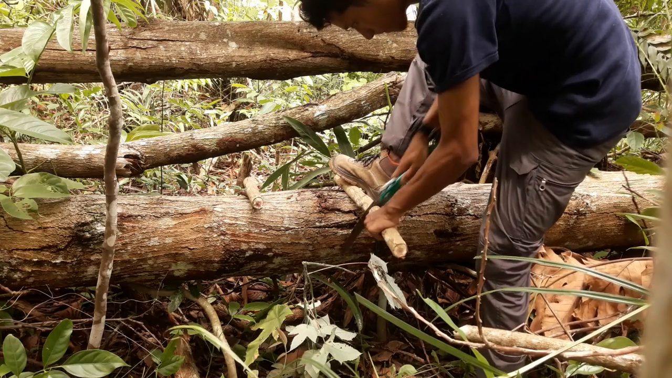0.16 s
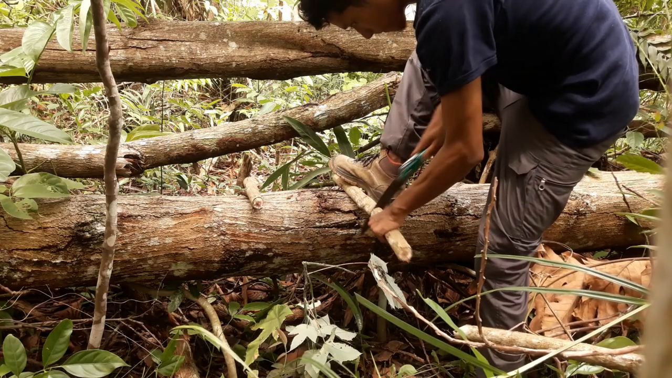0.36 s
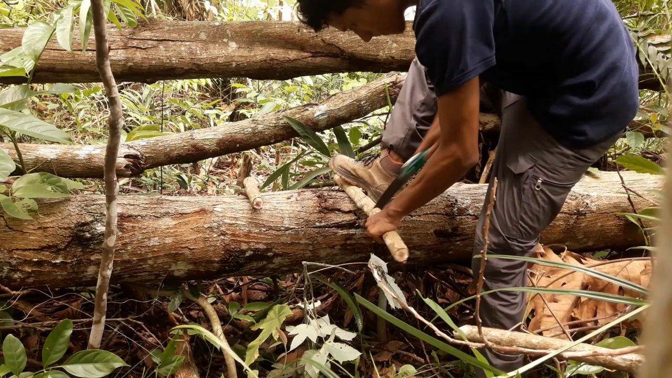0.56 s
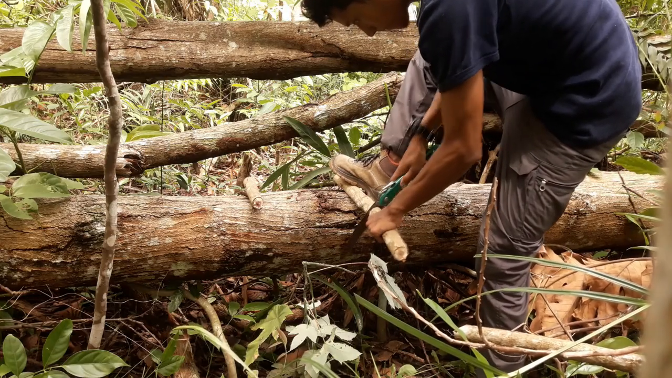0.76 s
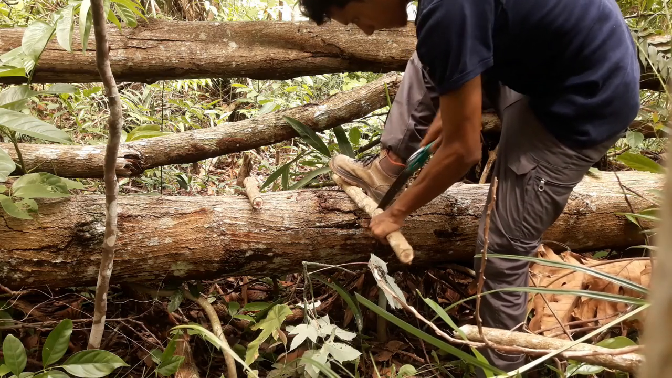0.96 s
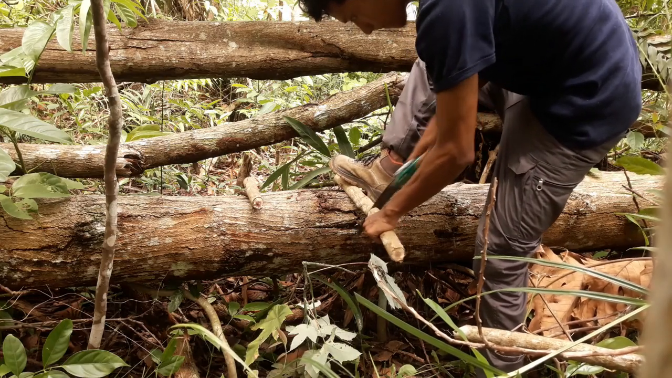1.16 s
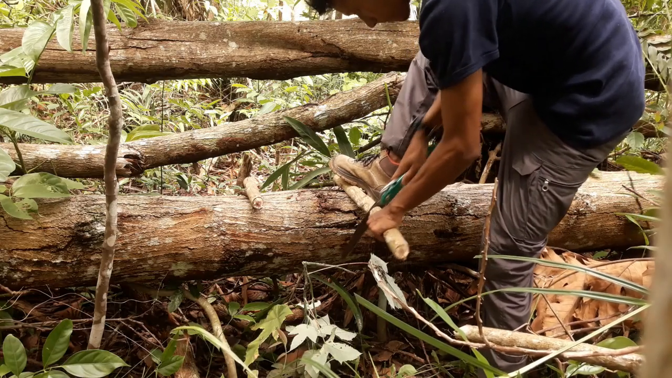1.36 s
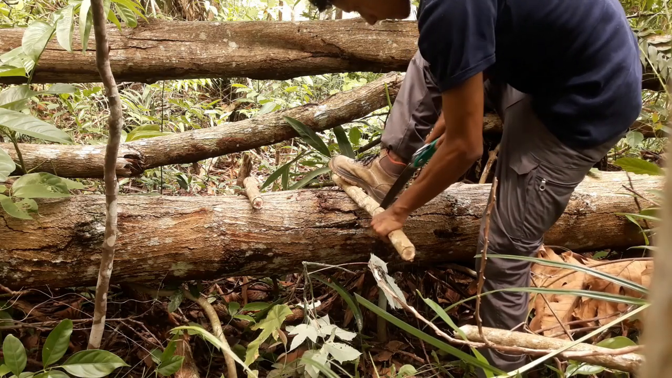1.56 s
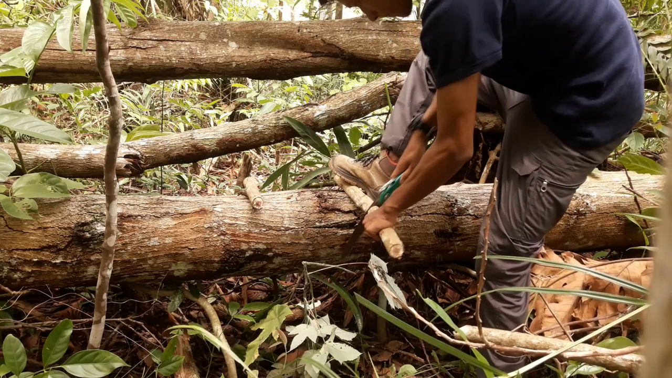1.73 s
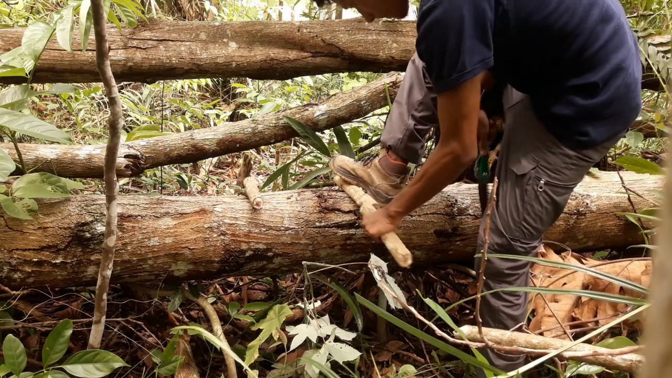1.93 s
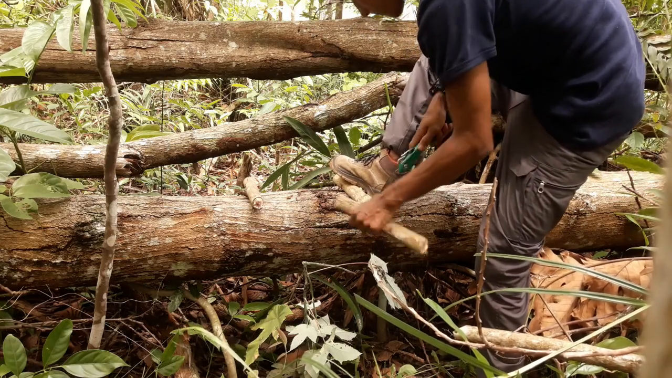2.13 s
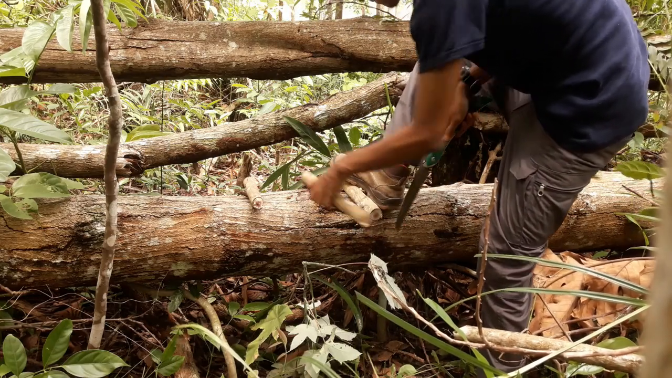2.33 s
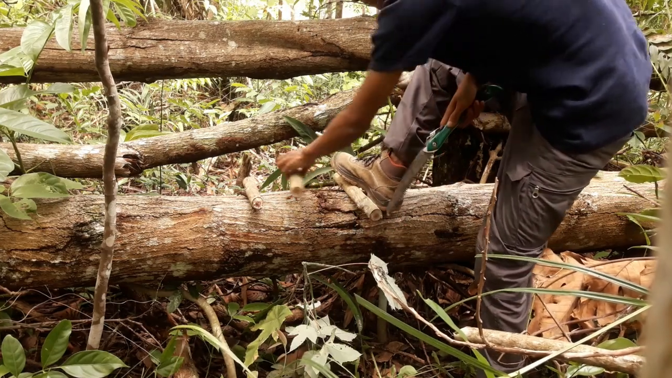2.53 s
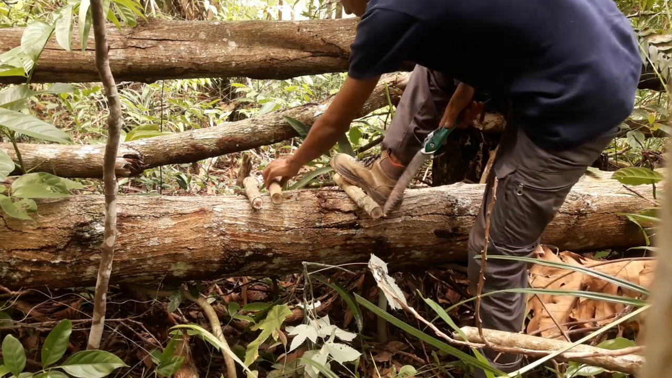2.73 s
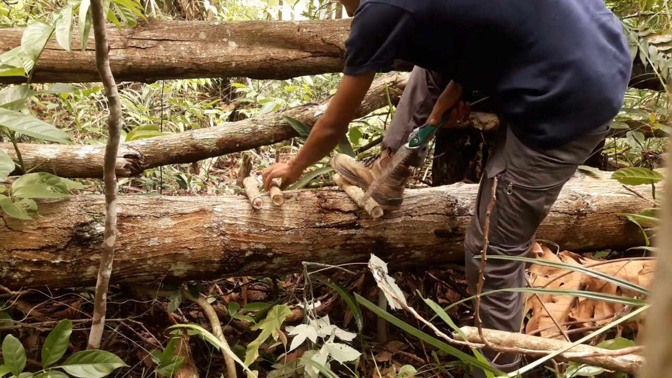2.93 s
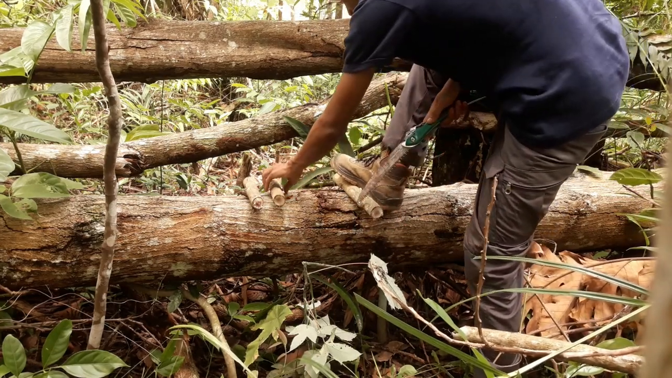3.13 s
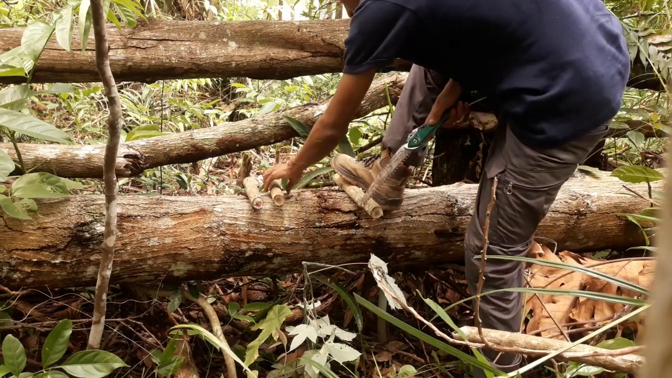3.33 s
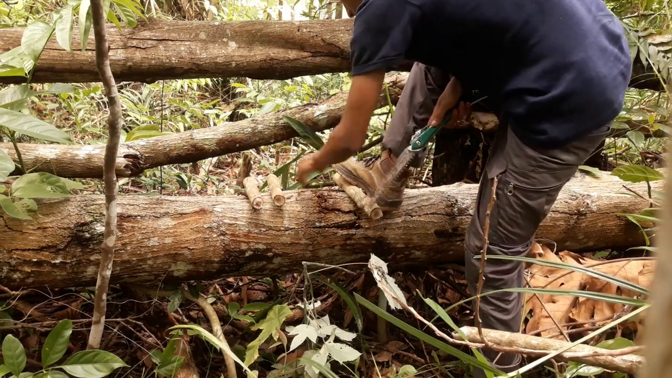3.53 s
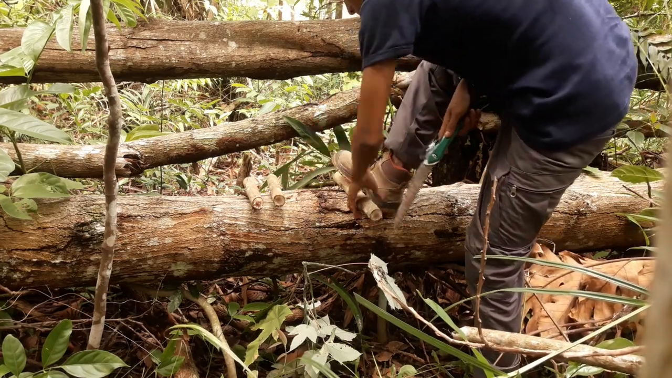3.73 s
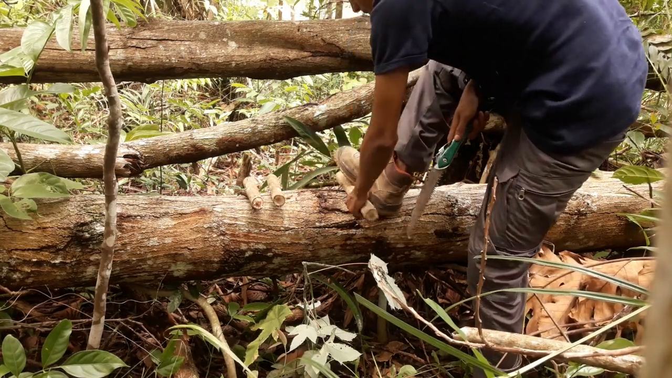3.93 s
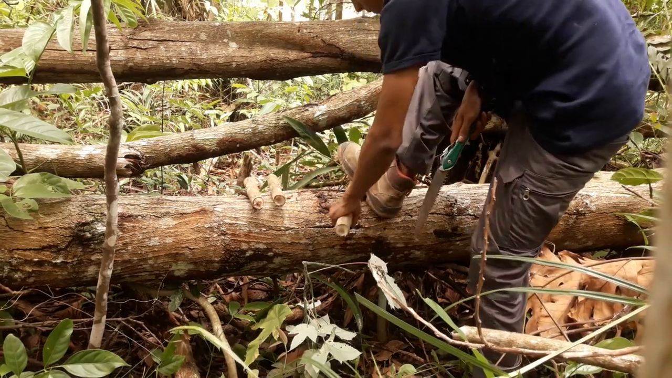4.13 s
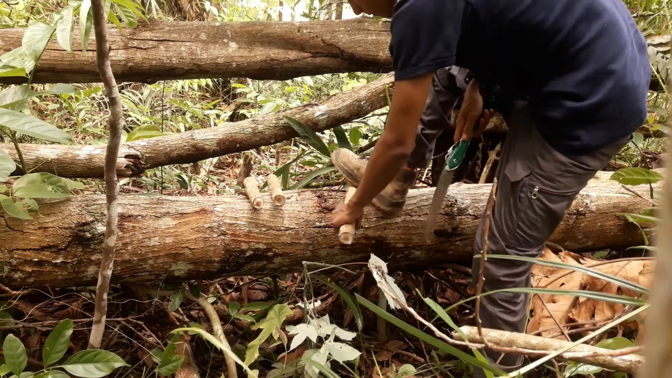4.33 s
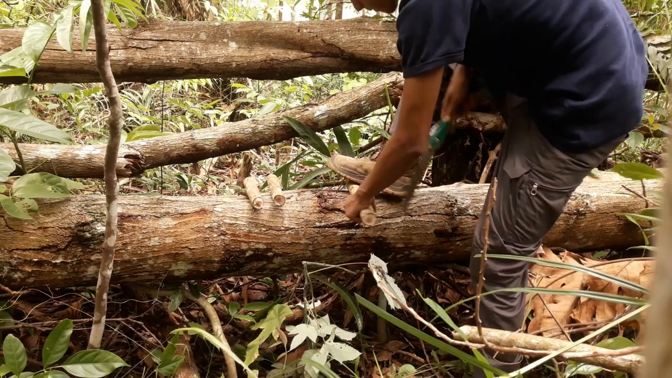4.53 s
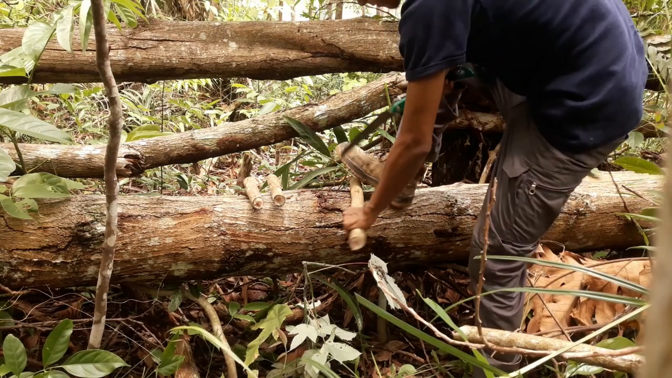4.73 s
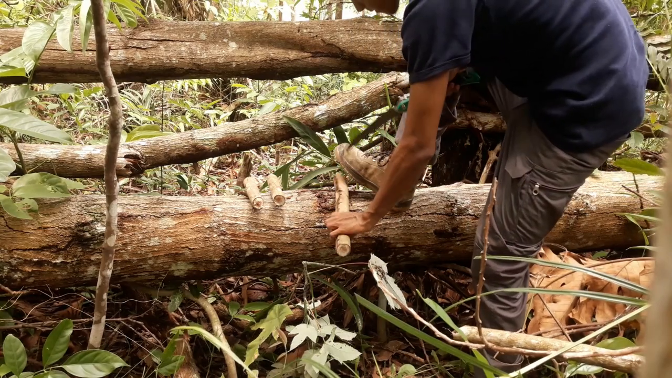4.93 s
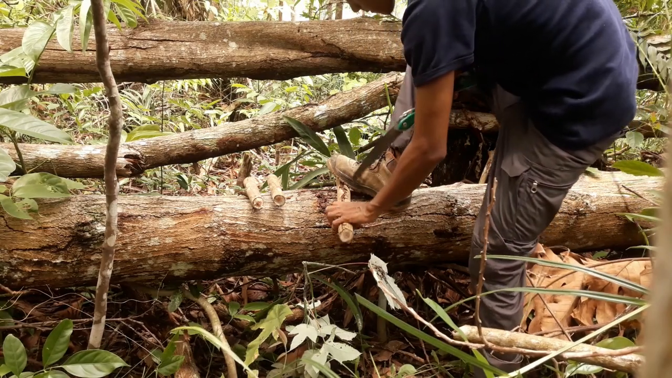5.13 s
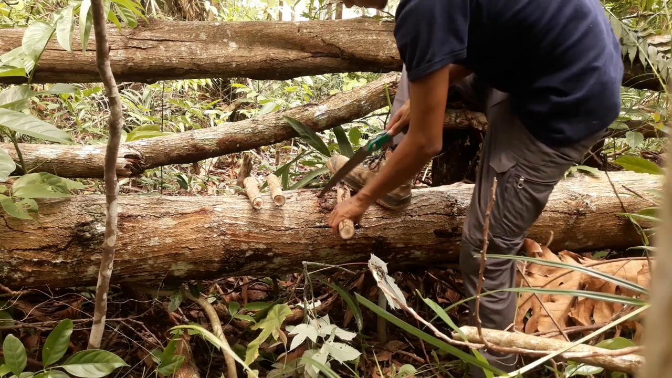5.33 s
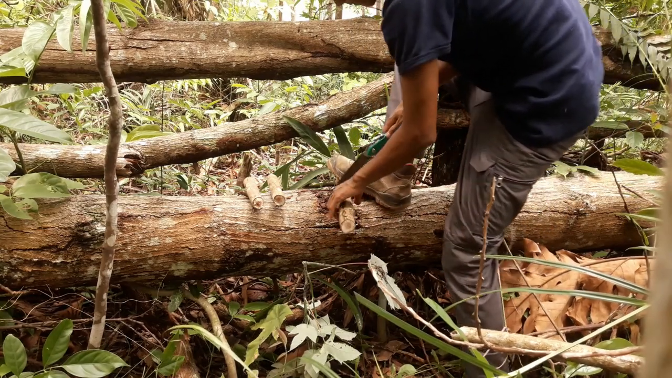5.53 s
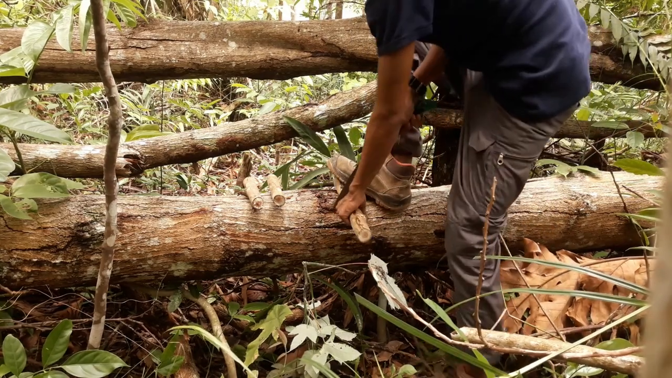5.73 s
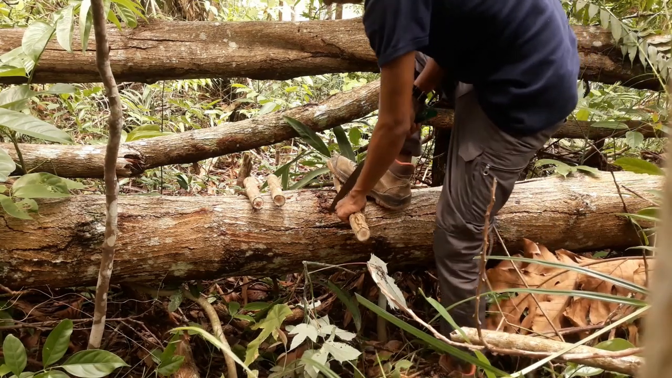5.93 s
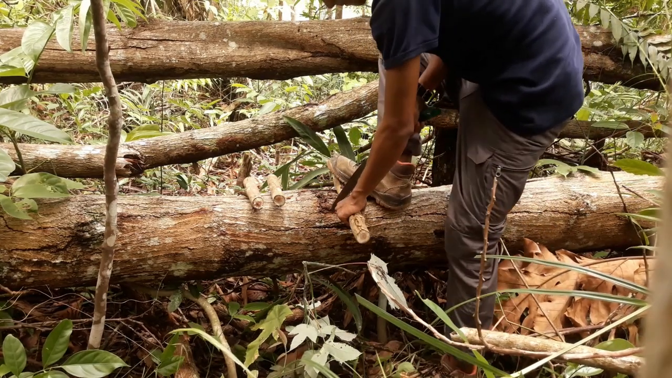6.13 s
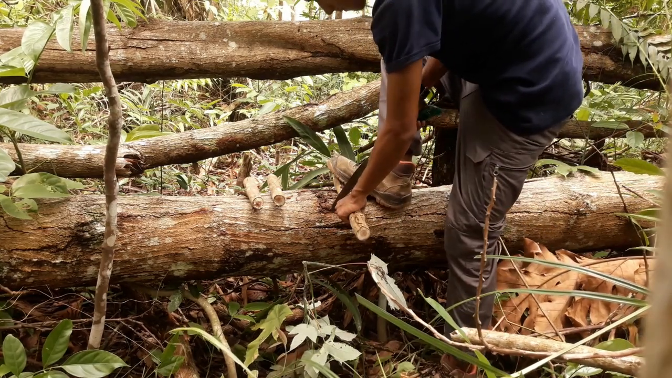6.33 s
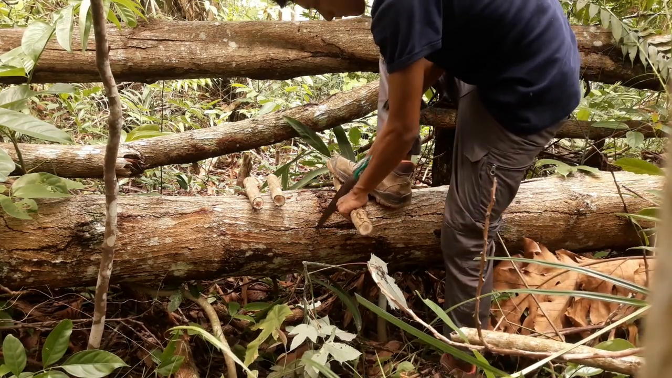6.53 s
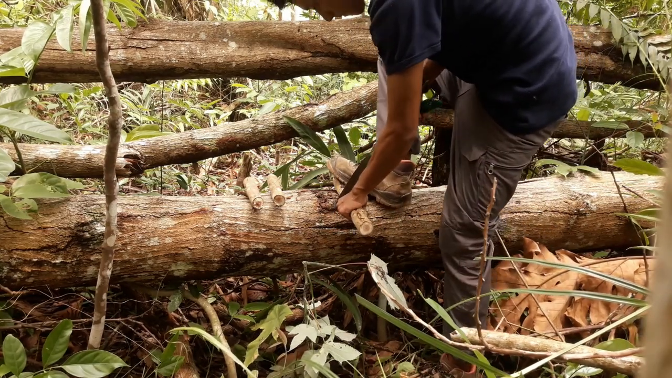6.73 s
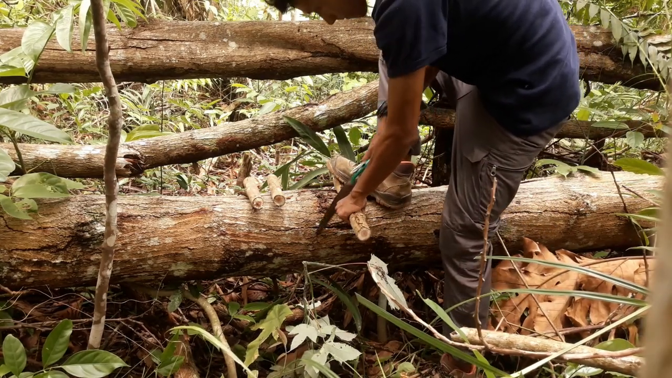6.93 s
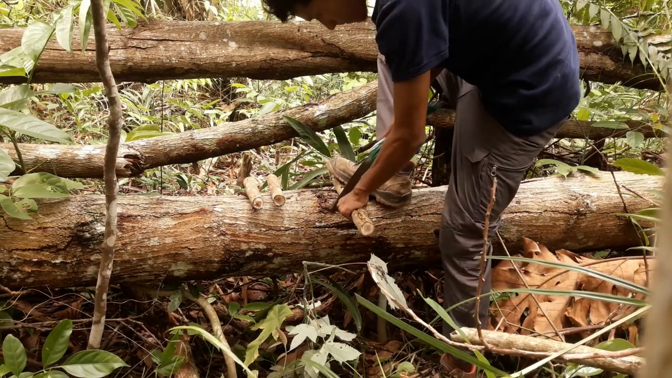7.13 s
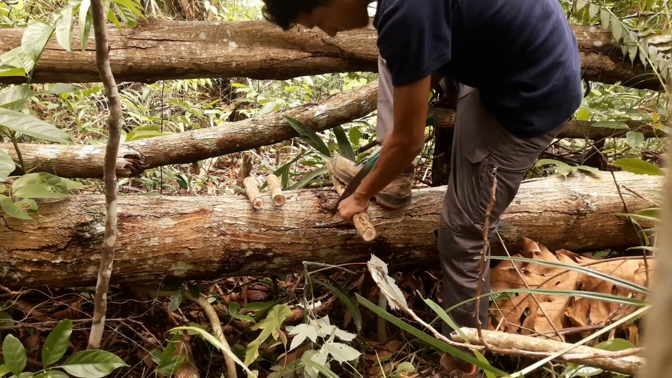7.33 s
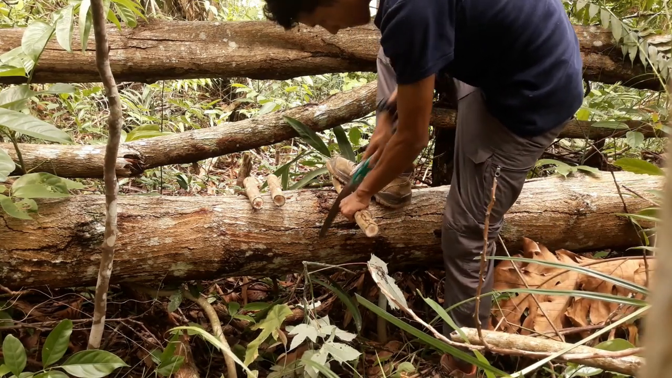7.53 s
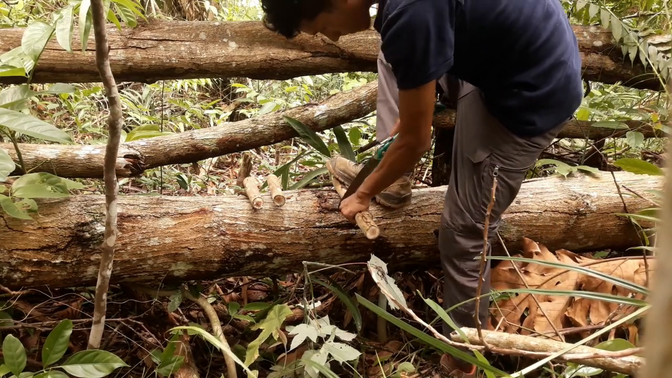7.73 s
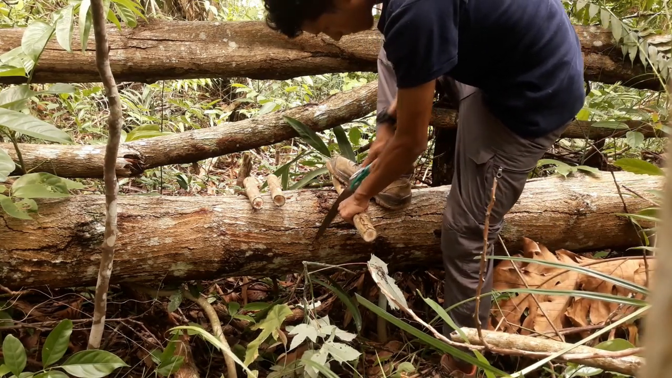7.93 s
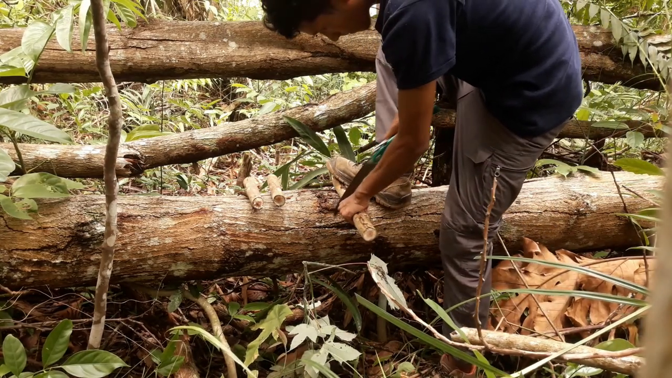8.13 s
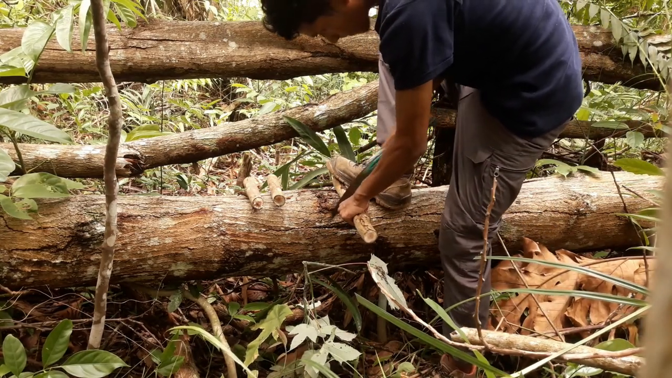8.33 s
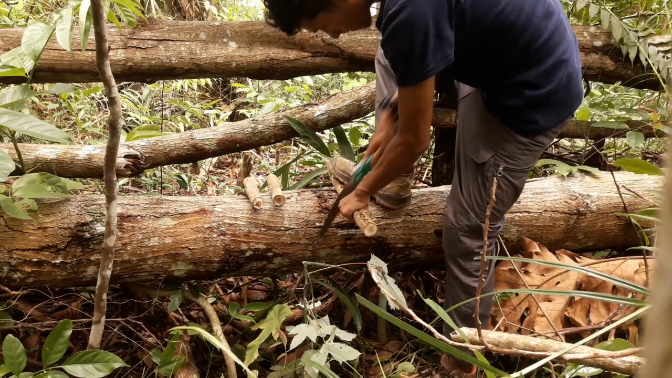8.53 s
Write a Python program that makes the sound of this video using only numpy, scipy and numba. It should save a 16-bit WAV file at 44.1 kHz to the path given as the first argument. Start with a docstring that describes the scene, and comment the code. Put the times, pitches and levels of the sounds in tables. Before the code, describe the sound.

A hand saw rasps through a branch until it snaps, then wood knocks and sawing resumes, over shrill forest cicadas.

```python
"""A folding saw rasps back and forth through a thin branch held on a log, a few metres away in a forest.
Its teeth tear fibres and ring the blade while the branch sticks, slips and judders. A piece snaps off;
the branch is shifted, knocking on the log among rustling leaves and rubbing bark, and a second cut begins.
Behind it, in mono, cicadas sing a steady high band, a far engine drones and the forest air rumbles."""
import sys
import numpy as np
from scipy import signal
from scipy.fft import rfft, irfft, next_fast_len
from scipy.io import wavfile
from scipy.ndimage import uniform_filter1d
from numba import njit

SR = 44100
rng = np.random.default_rng(int(sys.argv[2]) if len(sys.argv) > 2 else 0)


def to_wav(sig):
    """Store sig (one row per channel, or 1-D mono) as 16-bit WAV at the path in sys.argv[1].

    Samples outside -1..1 are clipped; the rate is SR.
    """
    pcm = np.clip(np.atleast_2d(sig), -1, 1) * 32767
    pcm = np.round(pcm).astype(np.int16)
    wavfile.write(sys.argv[1], SR, pcm.T)  # frames by channels


N = 377937
T = np.arange(N) / SR
CUT_THROUGH_S, NEW_GRIP_S = 1.807, 4  # the first cut ends; the branch is held anew for the second

# Saw strokes, away and back in turn: (start [s], length [s], fastest point [share of length], rasp [dB],
# treble over rasp [dB], sizzle over treble [dB], judder [dB], main low branch mode over judder [dB])
STROKES = [(-0.043, 0.23, 0.66, -40, -2, 0, -40, -7), (0.183, 0.149, 0.47, -34, -2, -1, -43, -12),
           (0.284, 0.229, 0.67, -42, 0, 0, -42, -4), (0.507, 0.156, 0.46, -35, -2, -1, -44, -9),
           (0.604, 0.216, 0.66, -40, -2, -1, -40, -6), (0.823, 0.163, 0.39, -35, 0, -2, -45, -20),
           (0.905, 0.226, 0.63, -40, -2, 1, -40, -3), (1.118, 0.167, 0.51, -36, -1, 0, -44, -8),
           (1.246, 0.19, 0.62, -39, -2, 0, -36, -6), (1.434, 0.157, 0.47, -36, -1, 0, -41, -9),
           (1.546, 0.23, 0.58, -40, -2, 0, -55, 1), (1.719, 0.23, 0.67, -31, -1, -1, -40, -5),
           (6.468, 0.166, 0.49, -54, 0, -2, -45, -7), (6.636, 0.151, 0.5, -41, 1, -3, -44, -2),
           (6.749, 0.197, 0.67, -43, -3, -4, -38, -4), (6.953, 0.153, 0.51, -37, 0, -5, -41, -7),
           (7.088, 0.21, 0.56, -41, -2, -4, -38, -8), (7.274, 0.153, 0.49, -36, 1, -4, -38, -9),
           (7.431, 0.207, 0.52, -44, -1, -2, -40, -6), (7.616, 0.159, 0.46, -36, 2, -5, -39, -7),
           (7.751, 0.216, 0.57, -44, -2, -2, -42, -7), (7.947, 0.157, 0.47, -36, 0, -4, -45, 0),
           (8.115, 0.23, 0.51, -46, 0, -3, -53, 2), (8.292, 0.154, 0.47, -33, 2, -5, -39, -20),
           (8.409, 0.23, 0.57, -41, -3, -2, -44, -1)]
# Tooth noise in three bands, low to high: (frequency [Hz], spectral level [dB])
RASP_EQ = [(500, -26.5), (1000, -2.5), (2800, -0.5), (3300, -8), (3800, -35.5)]
HISS_EQ = [(2800, -28.5), (3500, 3), (5000, -3.5), (7000, -0.5), (9000, -19.5)]
SIZZLE_EQ = [(6000, -6.5), (8000, 2.5), (9300, -4), (10300, 0), (11300, 1.5), (13000, 0), (16000, -1)]
ZING_HZ = [9100, 10200, 11000, 11900, 13000, 14300]  # top blade modes, which flare briefly

def saw(speeds):
    """Teeth tear fibres in dense clicks that ring the blade; the faster it moves, the louder the bite."""
    rasp_db, treble_db, sizzle_db = np.transpose(STROKES)[3:6]
    bite = undb(np.c_[rasp_db]) * speeds ** 1.5
    teeth = grains(7000, spread_db=2) * undb(1.2 * walk(200))
    rasp = undb(-4.5) * blade(teeth, BLADE_MODES[:4]) + undb(-4) * colour(teeth, RASP_EQ)
    treble = undb(-8) * blade(teeth, BLADE_MODES[4:]) + undb(-1) * colour(teeth, HISS_EQ)
    zing = sum(undb(6 * walk(45)) * ring(teeth, hz, width=300) for hz in ZING_HZ)
    sizzle = undb(-2.5) * colour(teeth, SIZZLE_EQ) + level(zing, -4)
    bands = (rasp, 0), (treble, treble_db), (sizzle, treble_db + sizzle_db)
    return sum(drag(mix(bite, over_db), db=-14.5) * undb(walk(40)) * band for band, over_db in bands)


def blade_speed():
    """Speed 0-1 of every stroke: a lopsided arch."""
    start, length, fastest = np.transpose(STROKES)[:3]
    progress = np.clip((T - np.c_[start]) / np.c_[length], 0, 1)
    skewed = progress ** np.c_[np.log(.5) / np.log(fastest)]
    return np.abs(np.sin(np.pi * skewed)) * ((T < CUT_THROUGH_S) | (T > NEW_GRIP_S))


def drag(gain, db, smear_s=.12):
    """The blade still scrapes as it turns round: a smeared copy of the envelope fills the gaps."""
    return np.hypot(gain, undb(db) * uniform_filter1d(gain, int(smear_s * SR)))


# The blade's ring: (frequency [Hz], nominal width [Hz], first-cut level [dB], second-cut level [dB])
BLADE_MODES = [(1255, 40, 9, -35), (1620, 74, 9.5, -24), (1903, 250, 9, 3.5), (2375, 160, 8, 12.5),
               (4050, 100, -2.5, 0.5), (4580, 300, -5, -2.5), (5160, 340, -10.5, 0),
               (5870, 400, -12.5, -12)]

def blade(teeth, modes):
    """Modes slide and swap strength as another length of blade passes through the cut."""
    out = 0
    for hz, width, first_db, second_db in modes:
        sliding_hz = hz * (1 + .025 * walk(14))
        db = np.where(T < NEW_GRIP_S, first_db, second_db) + 3 * walk(30)
        out = out + undb(db) * svf(svf(teeth, sliding_hz, 2. * width), sliding_hz, 2. * width)
    return level(out, 0)


# The branch's woody modes in each grip, main low mode first, plus the low buzz of its slipping (171 Hz)
# in the first cut: (frequency [Hz], width [Hz], level [dB])
FIRST_GRIP_BANDS = [(336, 29, 0), (532, 30, 0.5), (620, 320, 2.5), (820, 510, -10.5), (171, 40, 0.5)]
SECOND_GRIP_BANDS = [(356.4, 110, 0), (484, 65, 5.5), (545, 33, 11), (817, 250, -26.5), (260, 21, -18.5)]

def judder(gain, low_gain, bands, slip_hz):
    """The branch sticks and slips unevenly under the teeth; each slip rings its modes."""
    slip_count = np.floor(np.cumsum(slip_hz * (1 + .22 * walk(120))) / SR)
    slips = np.diff(slip_count, prepend=0) * undb(2 * walk(150))
    friction = level(slips, 0) + .5 * rng.standard_normal(N)
    force = colour(friction, [(110, -23), (170, -8.5), (300, 5), (750, -3.5), (1500, -13.5)])
    low, *rest = (undb(db) * svf(force, hz * (1 + .037 * walk(12)), float(width))
                  for hz, width, db in bands)
    return low_gain * level(low, -4) + gain * level(sum(rest), .2)


# Jolts as the teeth bind: (time [s], level [dB], main low mode over level [dB], 20 dB rise [s])
BINDS = [(0.107, -30, -4, 0.025), (0.274, -36, 0, 0.038), (0.462, -41, -4, 0.042), (0.742, -28, -5, 0.027),
         (0.904, -41, 7, 0.049), (1.042, -26, -9, 0.028), (1.208, -36, -25, 0.025), (1.355, -25, -6, 0.033),
         (1.508, -40, -6, 0.025), (1.673, -29, -8, 0.051), (1.714, -35, -5, 0.025),
         (1.787, -39, -10, 0.025), (1.811, -40, -5, 0.025), (1.836, -36, -11, 0.034),
         (6.559, -39, -25, 0.026), (6.677, -35, -7, 0.025), (6.749, -45, 1, 0.025),
         (6.875, -32, -25, 0.077), (7.062, -38, -11, 0.043), (7.223, -22, -16, 0.032),
         (7.326, -36, -11, 0.025), (7.382, -36, -7, 0.047), (7.548, -32, -2, 0.025),
         (7.567, -32, -9, 0.025), (7.726, -36, -25, 0.025), (7.903, -36, -13, 0.025),
         (8.045, -30, -25, 0.039), (8.211, -39, -22, 0.111), (8.377, -38, 2, 0.07), (8.528, -32, -6, 0.025)]

def shaking(speeds):
    """Envelopes for the branch's other bands and its main low mode: strokes shake it, binds jolt it."""
    stroke_db, stroke_low_db = np.transpose(STROKES)[6:]
    times, bind_db, bind_low_db, rise_s = np.transpose(BINDS)
    strokes = undb(np.c_[stroke_db]) * speeds ** 1.1
    jolts = swells(times, bind_db, rise_s, fall_s=1.5 * rise_s)
    gains = np.vstack([strokes, jolts])
    low = mix(gains, np.r_[stroke_low_db, bind_low_db])
    return drag(mix(gains), db=-21) * undb(.8 * walk(45)), low * undb(.8 * walk(25))


# Fibres and twigs breaking: (time [s], level [dB], centre [Hz], 60 dB decay [s])
SNAPS = [(1.7126, -16.5, 1780, 0.028), (1.7799, -25, 1840, 0.036), (1.8103, -13.5, 5990, 0.053),
         (1.8353, -6, 2520, 0.039), (1.8416, -10, 4160, 0.03), (1.8528, -17, 1710, 0.025),
         (1.8747, -15, 1624, 0.027), (1.909, -30, 2220, 0.04), (2.162, -43, 4980, 0.03),
         (2.37, -39.5, 1730, 0.06), (2.6394, -41, 5560, 0.03), (3.042, -51.5, 5640, 0.03),
         (3.0714, -51, 4680, 0.026), (4.5509, -17, 1250, 0.03), (4.8554, -33, 5400, 0.034),
         (5.8677, -22, 5600, 0.03), (5.8814, -16.5, 3400, 0.027), (6.0618, -26, 3270, 0.024)]

def snaps():
    """Breaking wood gives a sharp burst: a woody centre over a wide crack."""
    out = np.zeros(N)
    t = T[:int(.15 * SR)]
    for time, db, hz, t60 in SNAPS:
        rise_s = .0001 * undb(-db - 20)  # faint ones start softly
        burst = rng.standard_normal(len(t)) * np.exp(-np.log(1000) * t / t60) * (1 - np.exp(-t / rise_s))
        crack = .5 * burst + 1.9 * ring(burst, hz, .15 * hz)
        thinned = signal.lfilter([1, -1], [1, -.9], crack)  # bass roll-off
        out[int(time * SR):int(time * SR) + len(t)] += undb(db - 4) * thinned
    return out


# Wood hitting the log, first the cut-off piece tumbling, then the branch as it is shifted: (time [s], level
# [dB], pitch [Hz], log thud [dB], crack [dB], 60 dB decay [s])
KNOCKS = [(1.872, -38, 540, -10, -25, .04), (1.905, -34, 560, -8, -22, .03),
          (1.937, -38, 680, -14, -25, .035), (2.818, -48.5, 567, -12.5, -19.5, 0.037),
          (4.471, -40.5, 571, -5, -17, 0.04), (4.551, -17.5, 550, -7, -30, 0.015),
          (5.031, -33.5, 594, 6.5, -30, 0.04), (5.437, -35.5, 550, -6.5, -20, 0.065),
          (5.66, -26, 554, -14, -16, 0.053), (5.932, -18.5, 578, -6, -19, 0.03),
          (6.14, -23.5, 544, -6, -17, 0.029)]
# Partials of a knock: (frequency [multiple of pitch], level [dB], decay [share of the knock's])
KNOCK_MODES = [(1, 5, 1), (1.5, -26, .5), (2.15, -35, .7), (3.3, -26, .5), (4.2, -12.5, .6)]

def knocks(thud_hz=362):
    """Each blow rings the wood and the log under it; more crack also wakes the upper modes."""
    out = np.zeros(N)
    t = T[:int(.2 * SR)]
    for time, db, hz, thud_db, crack_db, t60 in KNOCKS:
        hiss = rng.standard_normal(len(t))
        fade = -np.log(1000) * t / t60
        first, *upper = (undb(mode_db) * np.sin(2 * np.pi * ratio * hz * t) * np.exp(fade / share)
                         for ratio, mode_db, share in KNOCK_MODES)
        branch = first + undb(crack_db + 16.5) * sum(upper)
        thud = undb(thud_db) * np.sin(2 * np.pi * thud_hz * t) * np.exp(fade)
        chatter = .55 * ring(hiss, .72 * hz, hz) * np.exp(.41 * fade)  # rough bark dirties the ring
        attack = 1 - np.exp(-t / .0014)
        crack = undb(crack_db) * hiss * np.exp(3 * fade)
        rattle = undb(crack_db - 7.5) * ring(hiss, 1550, 980) * np.exp(.55 * fade)  # loose bark
        knock = (branch + thud + chatter) * attack + crack + rattle
        out[int(time * SR):int(time * SR) + len(t)] += undb(db) * knock
    return out


# Brushes of leaves, bark and cloth: (time [s], level [dB], 20 dB rise [s], 20 dB fall [s],
# dull band over level [dB], crackle over level [dB])
BRUSHES = [(1.83, -34, .04, .07, -3, 1), (1.875, -44, .02, .17, -3, 0), (2.15, -66, .15, .2, -2, -2),
           (2.38, -65, .15, .2, -2, -2), (2.79, -63, .35, .13, -8, -2), (3.068, -63, .1, .07, -15, -6),
           (4.03, -62, .03, .15, -4, -10), (4.08, -53, .04, .1, -12, -3),
           (4.131, -38.5, .045, .045, -6, -18), (4.19, -45, .02, .075, -7, -15),
           (4.36, -64, .15, .15, -12, 0), (4.49, -58, .14, .1, -8, 2), (4.575, -56, .03, .07, 1, -3),
           (4.74, -51, .07, .2, -8, -12), (4.84, -52, .1, .12, -14, -9), (5.05, -62, .05, .2, -6, -2),
           (5.32, -57, .2, .2, -10, -8), (5.47, -60, .2, .3, -5, 0), (5.725, -46, .04, .06, -3, -3),
           (5.805, -34, .11, .1, -8, -4), (5.865, -37, .04, .13, -5, -5), (6.04, -53, .15, .25, -8, -2)]

def rustle(grit, stir_db=-77):
    """Brushed leaves give tiny clicks, patchy by band, over a faint stir that never rests."""
    *shape, dull_db, crackle_db = np.transpose(BRUSHES)
    gains = np.vstack([swells(*shape), np.full(N, undb(stir_db))])
    dull = undb(1.2 * walk(25)) * colour(grit, [(900, -31), (1500, -1.5), (2500, -2), (3500, -22)])
    crisp = colour(grit, [(2500, -26), (3500, -5), (5000, -1.5), (7000, -5.5), (9000, -27)])
    crisp *= undb(1.2 * walk(25) - 1)
    crackle = undb(2) * colour(grit, SIZZLE_EQ)
    dull_gain = mix(gains, np.r_[dull_db, -4])  # the appended offset is the stir's
    crackle_gain = mix(gains, np.r_[crackle_db, 2])
    return dull_gain * dull + mix(gains) * crisp + crackle_gain * crackle


# Bark on bark: (time [s], level [dB], 20 dB rise [s], 20 dB fall [s], ring [Hz], body over ring [dB])
RUBS = [(1.91, -52, .015, .12, 980, 0), (2.1, -70, .2, .6, 900, -2), (2.62, -62, .2, .08, 970, -6),
        (2.8, -69, .1, .1, 830, 0), (4.025, -60, .015, .12, 1100, -6), (4.13, -50, .05, .1, 1250, -12),
        (4.19, -56, .04, .15, 1200, -12), (4.48, -56, .04, .12, 850, 3), (4.58, -56, .03, .08, 946, 0),
        (4.85, -56, .15, .25, 850, 0), (5.0, -59, .06, .15, 830, 3), (5.264, -56, .08, .25, 847, -7),
        (5.52, -65, .2, .12, 901, 0), (5.726, -53, .04, .15, 950, 1), (5.86, -48, .25, .1, 980, 2),
        (6.055, -54, .045, .05, 880, 0), (6.18, -66, .03, .1, 908, 4)]

def bark_rub(grit, floor_db=-78, width_hz=410.):
    """Rubbed bark scrapes with a ring over a hollow body, and never quite falls silent."""
    *shape, ring_hz, body_db = np.transpose(RUBS)
    gains = swells(*shape)
    hz = ring_hz[np.argmax(gains, axis=0)]  # the loudest rub sets the pitch
    scrape = level(svf(svf(grit, hz, width_hz), hz, width_hz), -1)
    scrape *= np.hypot(mix(gains), undb(floor_db))
    body = undb(.5) * colour(grit, [(250, -7), (500, -2), (1500, -16.5), (2200, -31.5)])
    body *= np.hypot(mix(gains, body_db), undb(floor_db))
    return undb(2 * walk(25)) * (scrape + body)


def tree_scatter(near, t60_s=.15, wet_db=-20):
    """Trunks and leaves scatter a short diffuse tail."""
    t = T[:SR // 2]
    tail = rng.standard_normal(len(t)) * np.exp(-np.log(1000) * t / t60_s) * (t > .006)
    return signal.fftconvolve(near, undb(wet_db) * tail / np.sqrt(np.sum(tail ** 2)))[:N]


# The cicadas' shrill band: (frequency [Hz], spectral level [dB])
CICADA_EQ = [(3290, -82.5), (5600, -37.5), (6000, -32.5), (6460, -12.5), (7440, 0.5), (7980, -9.5),
             (8440, -31.5), (8810, -33.5), (10400, -42.5), (12200, -42), (13100, -26.5), (13600, -20.5),
             (14800, -16), (15700, -19)]

def cicadas(db=-38.5):
    """A chorus of clicking membranes, too many to tell apart, ringing one body band and its octave."""
    return undb(db + .72 * walk(2) + .44 * walk(26)) * colour(grains(8000, spread_db=1), CICADA_EQ)


# The engine's slow pitch bend: (time [s], firing rate [Hz])
ENGINE_RATE = [(0, 33.8), (1, 33), (2, 32.3), (2.7, 31.7), (3.5, 31.7), (4.2, 32.4), (5.25, 33.6),
               (6.5, 35.3), (7.3, 36.3), (8.57, 37.2)]
# Partials of the drone: (frequency [multiple of firing rate], level [dB])
ENGINE_ORDERS = [(2, -69.5), (2.5, -77.5), (3, -59.5), (4, -55), (5, -66.5), (6, -71)]
# Fader ride on the drone: (time [s], gain [dB])
ENGINE_FADER = [(0, 0), (1.5, 3.5), (2.5, -3.5), (4, -1), (5.5, 0), (7, 1), (8.57, -3)]

def engine():
    """A far engine's low firing orders, each wavering over the long path."""
    phase = 2 * np.pi * np.cumsum(np.interp(T, *np.transpose(ENGINE_RATE))) / SR
    drone = sum(undb(db + 2 * walk(7.3)) * np.sin(order * phase + .74 * walk(3))
                for order, db in ENGINE_ORDERS)
    return np.sqrt(2) * undb(np.interp(T, *np.transpose(ENGINE_FADER))) * drone


# The forest's ambience bed: (frequency [Hz], spectral level [dB])
FOREST_EQ = [(25, -29.5), (60, -9), (110, -4.5), (160, -8.5), (250, -14), (600, -29.5), (1500, -42),
             (4500, -41.5), (12000, -41)]

def forest_air(db=-58.5):
    """A soft rumble with faint hiss, drifting gently in level."""
    return undb(db + walk(2.3)) * colour(rng.standard_normal(N), FOREST_EQ)


def undb(db):
    """Decibels to gain."""
    return np.exp(np.asarray(db) * np.log(10) / 20)


def level(x, db):
    """Sets the rms of x to db."""
    return x * undb(db) / np.sqrt(np.mean(x ** 2))


def colour(x, points):
    """Equalises x by (frequency [Hz], level [dB]) points; rms 1."""
    hz, db = np.transpose(points)
    size = next_fast_len(N)
    log_hz = np.log(np.arange(1, size // 2 + 2) * SR / size)
    curve = undb(np.interp(log_hz, np.log(hz), db))
    return level(irfft(rfft(x, size) * curve, size)[:N], 0)


def ring(x, hz, width):
    """One resonance, gain 1 at its centre."""
    return signal.lfilter(*signal.iirpeak(hz, hz / width, fs=SR), x)


@njit
def svf(x, hz, width):
    """State-variable band-pass whose centre moves; gain 1 at the centre."""
    y, band_state, low_state = np.empty(len(x)), 0., 0.
    for i in range(len(x)):
        g, damping = np.tan(np.pi * hz[i] / SR), width / hz[i]
        band = (band_state + g * (x[i] - low_state)) / (1 + g * (g + damping))
        band_state, low_state = 2 * band - band_state, low_state + 2 * g * band
        y[i] = damping * band
    return y


def walk(rate):
    """Random levels held 1 / rate s and slewed twice; spread near 1."""
    hold = int(SR / rate)
    steps = np.repeat(rng.standard_normal(N // hold + 1), hold)
    return 1.3 * uniform_filter1d(uniform_filter1d(steps, hold), hold)[:N]


def grains(rate, spread_db):
    """Clicks at random moments, a few much larger than the rest."""
    when, sign, size = rng.random((3, N))
    return (when < rate / SR) * np.sign(sign - .5) * undb(-spread_db * np.log(1 - size))


def swells(times, db, rise_s, fall_s):
    """One envelope per event: 20 dB up in rise_s, 20 dB down in fall_s."""
    late = T - np.c_[times]
    return undb(np.c_[db] - 20 * np.where(late < 0, -late / np.c_[rise_s], late / np.c_[fall_s]))


def mix(gains, over_db=0):
    """Power sum of the events' envelopes, each offset by over_db."""
    offsets = np.c_[undb(over_db) * np.ones(len(gains))]
    return np.sqrt(np.sum((gains * offsets) ** 2, axis=0))


def scene():
    """Saw and branch up front with their tail from the trees, over cicadas, engine and air."""
    speeds = blade_speed()
    near = saw(speeds) + knocks() + snaps()
    grit = grains(11000, spread_db=1.9) * undb(2 * walk(50))  # tiny contacts of leaves and bark
    near += rustle(grit) + bark_rub(grit)
    shake = shaking(speeds)
    first_cut = judder(*shake, FIRST_GRIP_BANDS, slip_hz=170.3)
    second_cut = judder(*shake, SECOND_GRIP_BANDS, slip_hz=145.5)
    near += np.where(T < NEW_GRIP_S, first_cut, second_cut)
    return np.tile(near + tree_scatter(near) + forest_air() + cicadas() + engine(), (2, 1))


def record(dry, low_cut_hz=45, top_hz=15750):
    """The microphone loses the deepest bass; the top is cut steeply."""
    dry = signal.sosfilt(signal.butter(2, low_cut_hz, "high", fs=SR, output="sos"), dry)
    return signal.sosfilt(signal.ellip(10, .2, 70, top_hz, fs=SR, output="sos"), dry)


dry = scene()
out = record(dry)
to_wav(out)
```